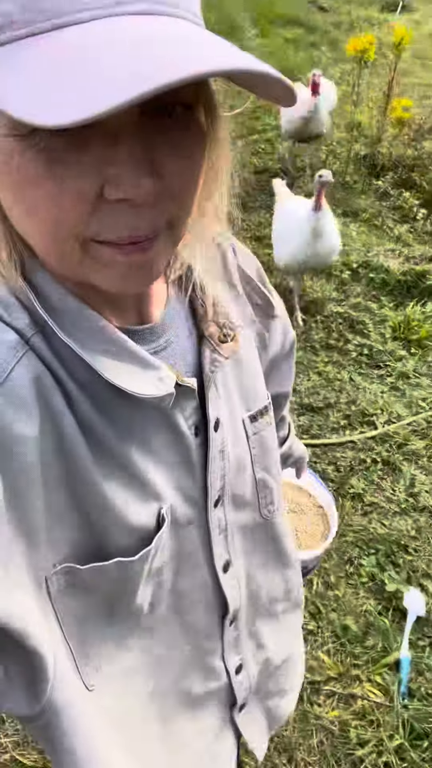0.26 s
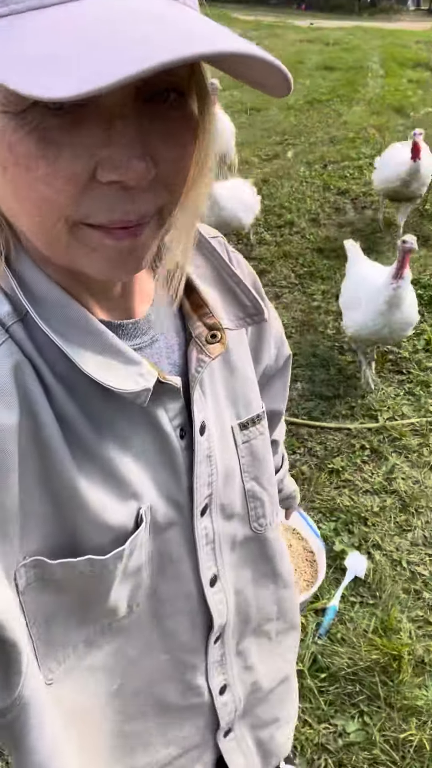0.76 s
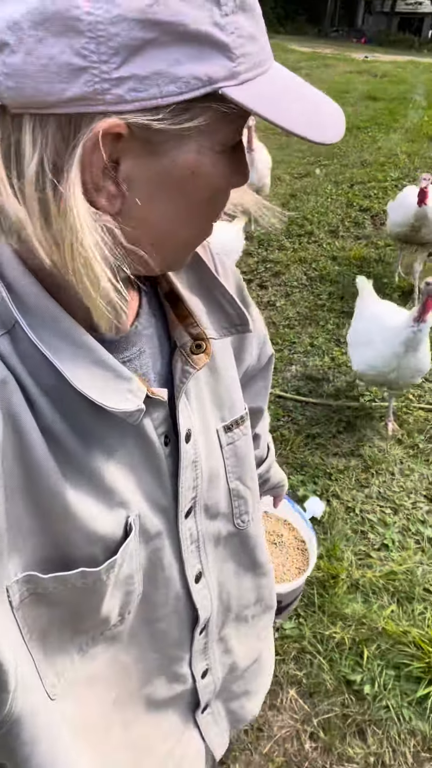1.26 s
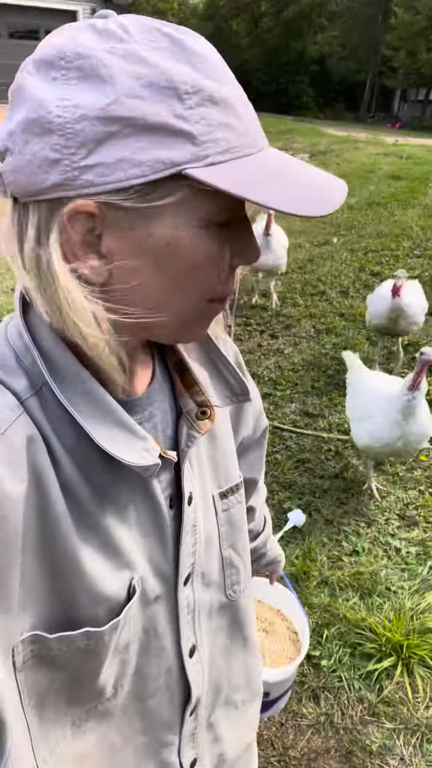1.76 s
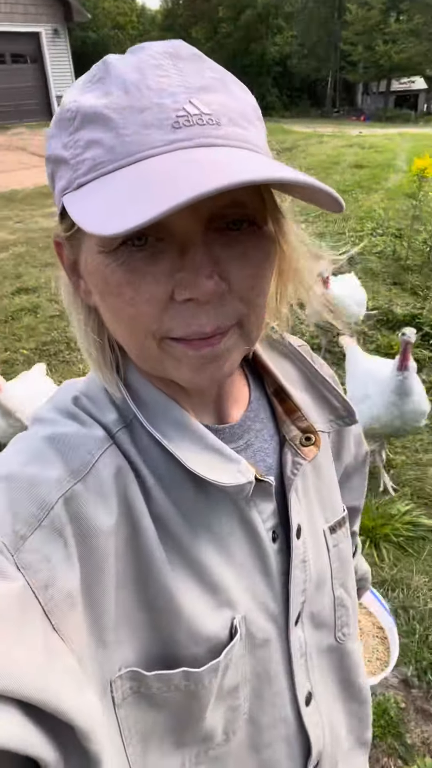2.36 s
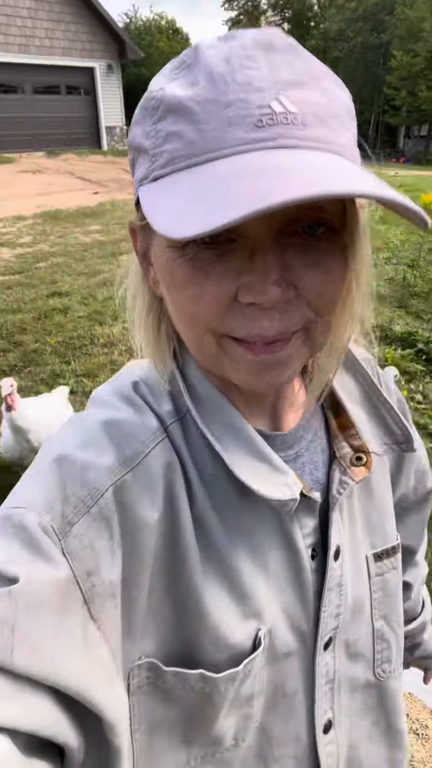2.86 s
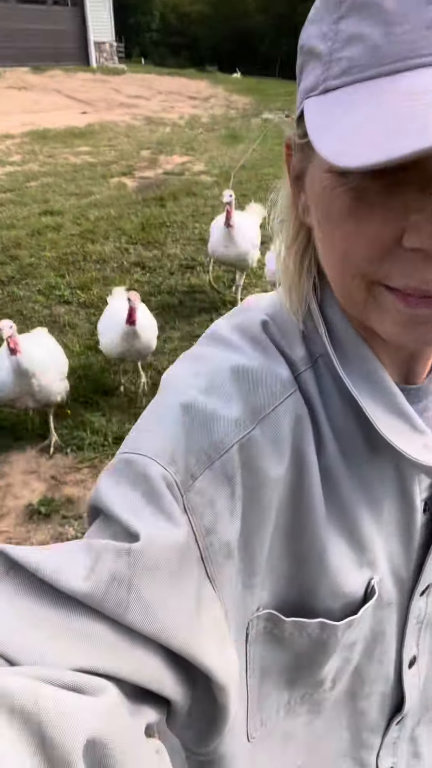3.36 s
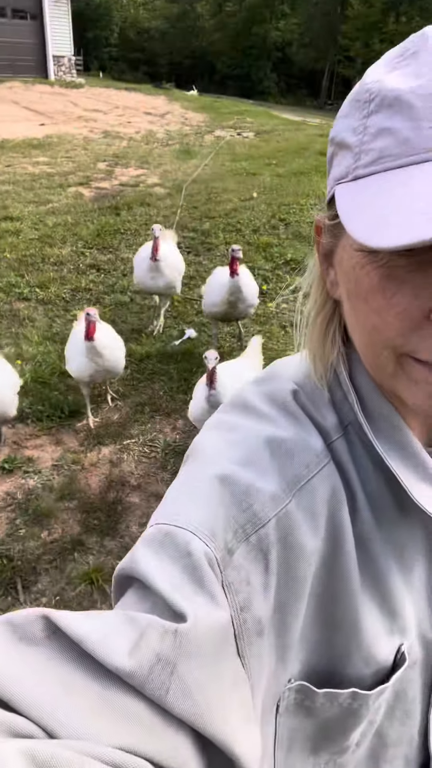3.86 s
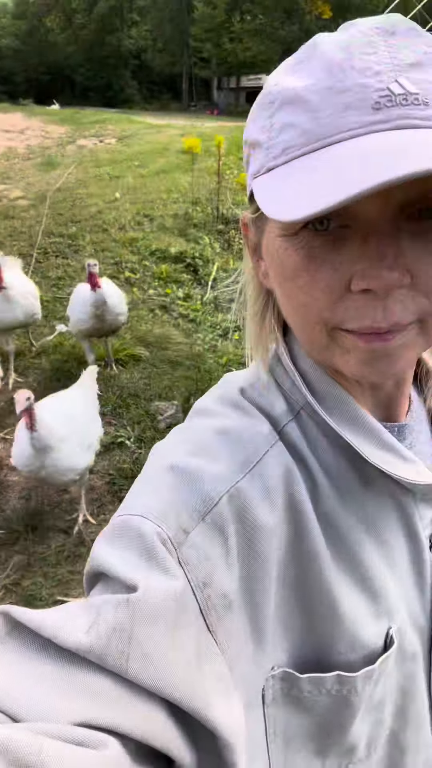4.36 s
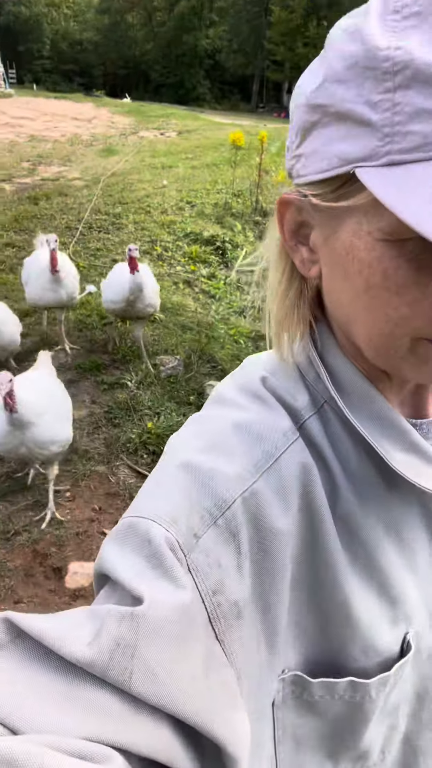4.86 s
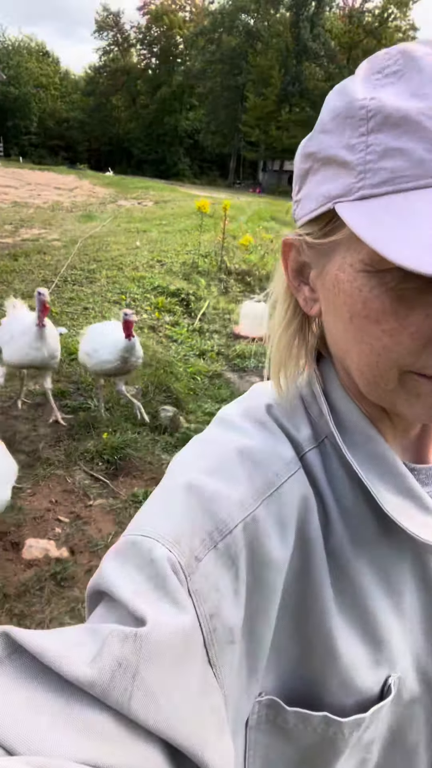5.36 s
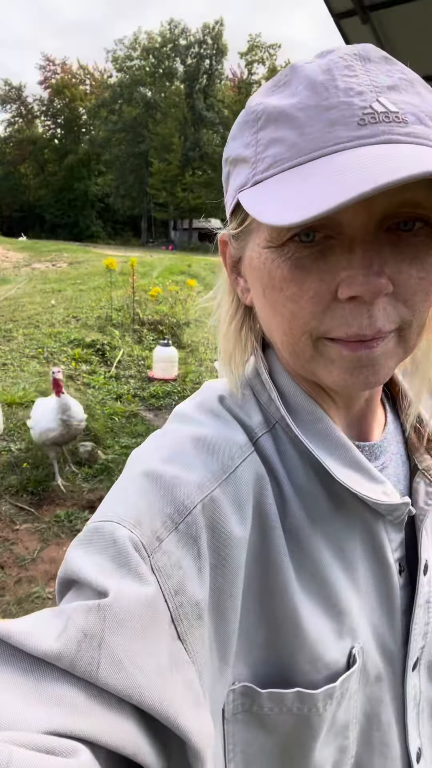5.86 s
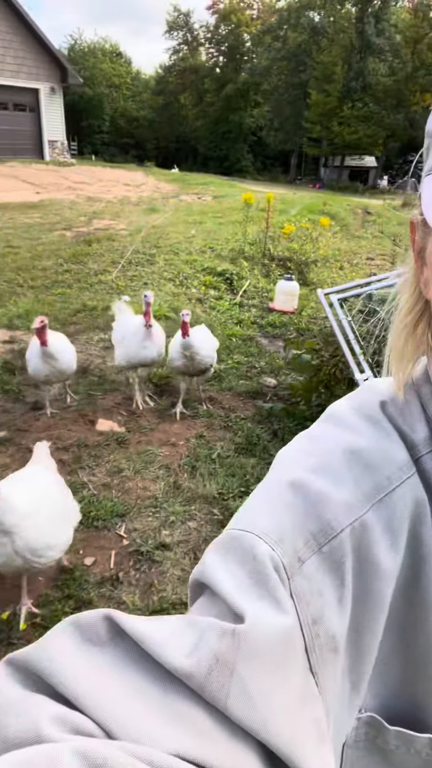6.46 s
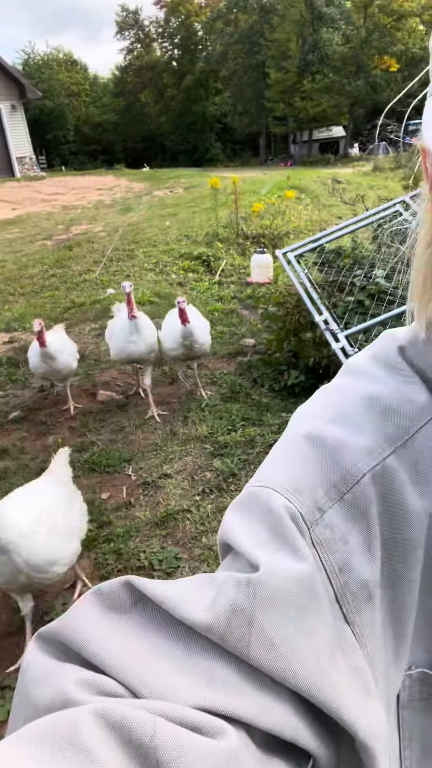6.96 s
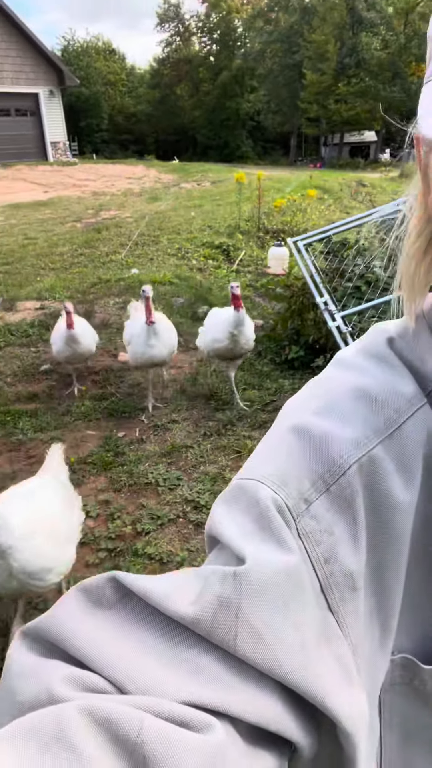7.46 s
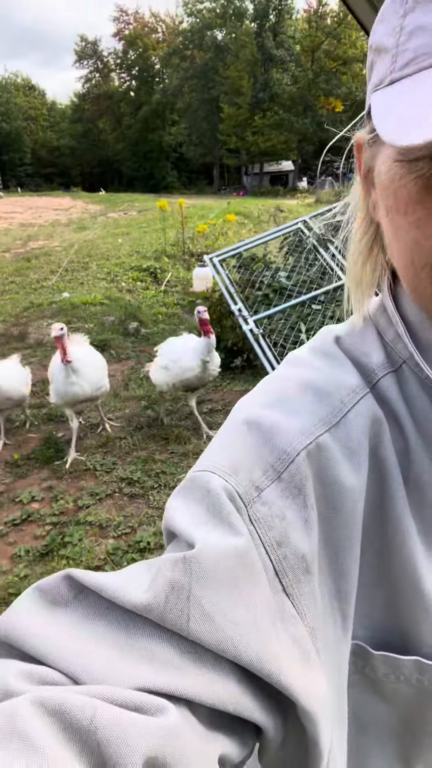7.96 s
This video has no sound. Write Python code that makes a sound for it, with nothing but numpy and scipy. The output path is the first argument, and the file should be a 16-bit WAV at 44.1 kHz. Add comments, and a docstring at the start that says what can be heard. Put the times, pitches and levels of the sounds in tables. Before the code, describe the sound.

A close handheld stereo microphone in an open grassy yard. At 0-0.4 s, wind rumbles and dull knocks hit the housing as a turkey begins a whistled call, a wavering held note followed by quick rising chirps until 0.8 s. Grass swishes loudly around 0.6 and 1.1 s. More trills come at 1.1-1.4 s, then a throbbing note at 1.7 s breaking into a fast jumble by 2.0 s, and another run at 2.6-2.9 s. Feet crunch at 2.8 and 3.3 s with small twig cracks. A softer low call sounds near 3.9 s. A brisk trill at 4.5-4.8 s ends with a sharp twig snap; a faint far bird whistles at 4.9 s and a brief step crunches at 5.1 s. Calls return at 5.8-6.1 and, brighter, 6.5-6.8 s. Strong rustling follows at 7.1 s, then a final lively trill from 7.8 s to the end. Faint leaf hiss continues throughout.

```python
"""A few turkeys follow a walker over a grassy yard, each calling a short trill of whistled notes:
near-sines of gliding pitch, with an octave weighted by the throat and a short diffuse echo.
Feet swish and crunch through grass (dense coloured grains) and twigs snap (noise bursts with rings).
Gusts buffet the microphone ports (low noise bands), knocks shake the housing (damped sines),
and one far bird whistles (a sine) over leaves in the breeze (steady coloured noise)."""
import sys
import numpy as np
from scipy import signal
from scipy.fft import rfft, irfft
from scipy.io import wavfile

SR = 44100
rng = np.random.default_rng(int(sys.argv[2]) if len(sys.argv) > 2 else 0)


def file_out(sig):
    """Save sig as 16-bit WAV at sys.argv[1]."""
    # one column per channel
    cols = np.atleast_2d(sig).T
    # limit, then scale
    lim = np.clip(cols, -1, 1)
    pcm = np.round(lim * 32767).astype(np.int16)
    wavfile.write(sys.argv[1], SR, pcm)


N = 362502
TIME = np.arange(N) / SR


def from_db(db):
    """Level and amplitude: 20 dB is a factor of ten in gain."""
    return 10 ** (np.asarray(db) / 20)


def rms_one(x):
    """Normalisation: scales a signal to unit root mean square."""
    return x / np.sqrt(np.mean(x ** 2) + 1e-20)


def in_time(rows, t):
    """Linear interpolation: joins each column of a time table by straight lines."""
    s, *columns = np.transpose(rows)
    return [np.interp(t, s, column) for column in columns]


def drift(rate_hz):
    """Low-passed chance: white noise through two equal poles at rate_hz, with a spread of about 1."""
    step = 40   # samples between the values drawn
    pole = np.exp(-2 * np.pi * rate_hz * step / SR)
    noise = rng.standard_normal(N // step + 2002)
    slow = signal.lfilter([1], [1, -2 * pole, pole * pole], noise)[2000:]   # without the settling
    return np.interp(np.arange(N) / step, np.arange(len(slow)), rms_one(slow))


def band(x, low_hz, high_hz):
    """Band-pass filtering: passes what lies between two corner frequencies."""
    return signal.sosfilt(signal.butter(2, [low_hz, high_hz], "band", fs=SR, output="sos"), x)


def grains(per_s, spread_db):
    """Shot noise: random clicks of uneven size and either sign, unrelated in mid and side."""
    sizes = from_db(spread_db * np.minimum(rng.exponential(1, (2, N)), 5))
    sizes *= rng.choice([-1, 1], (2, N))
    return rms_one(sizes * (rng.random((2, N)) < per_s / SR))


def coloured(source, spectrum, lag_share=.55):
    """Spectral shaping and stereo coherence: part of the side is the mid turned by a quarter cycle."""
    # stereo width against frequency: f/Hz, side over mid level/dB
    width = [(2400, -2.5), (4000, -8.5), (6500, -17.5), (8200, -5.5), (11500, 1.5), (13300, 24.5)]
    log_f = np.log(np.arange(1, N // 2 + 2) * SR / N)
    level_db, side_db = [np.interp(log_f, np.log(np.array(p)[:, 0]), np.array(p)[:, 1])
                         for p in (spectrum, width)]
    mid, own = rfft(source)
    side = -1j * lag_share * mid + np.sqrt(1 - lag_share ** 2) * own   # the lag between the ports
    shaped = irfft([mid, side] * from_db([level_db, level_db + side_db]), N)
    mid, side = shaped / np.sqrt(np.mean(shaped[0] ** 2))   # the mid has rms 1
    return np.array([mid + side, mid - side])


def swells(rows, under_db):
    """Incoherent summation: bumps around their peaks and the level beneath them add as power."""
    rise_over_fall, roundness = 1.2, 1.75   # a bump rises a little slower than it fades
    power = from_db(2 * np.asarray(under_db)) * np.ones(N)
    for s, fall_ms, *peak_db in rows:
        near = slice(max(round((s - .6) * SR), 0), round((s + .6) * SR))
        t = (TIME[near] - s) * 1000 / fall_ms
        fall_db = -10 * np.where(t < 0, -t / rise_over_fall, t) ** roundness
        power[..., near] += from_db(2 * (np.array(peak_db)[:, None] + fall_db)).squeeze()
    return np.sqrt(power)


def air():
    """Stationary broadband noise: far leaves in the breeze, drifting slowly in level."""
    # spectrum of the leaves: f/Hz, relative level/dB
    leaves = [(290, -0.5), (500, 10), (1400, 1), (9880, 0), (12000, -16), (14000, -24)]
    level_db = -66.5 + 3 * drift(6)
    return from_db(level_db) * coloured(rng.standard_normal((2, N)), leaves)


def songbird():
    """Pure tone with random phase and level modulation: one thin far whistle."""
    # the whistle: t/s, length/ms, f/Hz, level/dB
    s, ms, hz, level_db = (4.905, 125, 3170, -63)
    shape = np.clip(1 - (2 * (TIME - s) * 1000 / ms - 1) ** 2, 0, 1)   # a parabolic arch
    whistle = np.sin(2 * np.pi * hz * TIME + 2 * drift(30))
    return from_db(level_db + 3 * drift(40)) * shape * whistle


def knocks():
    """Damped resonance: each dull knock is a few cycles of the housing, swelling fast and dying."""
    # knocks and jolts: t/s, level/dB, ring f/Hz
    jolts = [(0.029, -33.5, 378), (0.088, -34, 313), (0.302, -35, 190), (1.448, -47, 90), (2.803, -39, 371),
             (3.092, -48, 96), (3.118, -45.5, 97), (3.228, -47, 67), (5.157, -45, 127), (6.426, -46.5, 200),
             (6.466, -47, 187), (6.773, -46, 192), (6.984, -41.5, 98)]
    swell_cycles = 0.76   # cycles until the envelope peaks
    out = np.zeros(N)
    for s, level_db, hz in jolts:
        turns = hz * TIME[:SR // 10]
        envelope = turns / swell_cycles * np.exp(1 - turns / swell_cycles)
        out[round(s * SR):][:len(turns)] += from_db(level_db) * envelope * np.sin(2 * np.pi * turns)
    return out


def wind():
    """Turbulent pressure at the ports: rumble and sharper lumps; strong gusts go deeper and wider."""
    # gusts and jolts at the ports: peak t/s, fall by 10 dB/ms, rumble level/dB, lumps level/dB
    gusts = [(0.06, 76, -37.5, -40), (0.3, 58, -47.5, -50.5), (1.17, 40, -52, -59.5),
             (1.53, 41, -47, -44.5), (1.65, 96, -56, -42), (2.26, 42, -43.5, -66), (3.31, 27, -49.5, -48.5),
             (5.3, 93, -57, -84), (7.03, 73, -82, -56)]
    # wind under the gusts: t/s, rumble level/dB, lumps level/dB
    breeze = [(0.0, -46.5, -56), (0.6, -61.5, -89), (1.8, -55.5, -106), (2.5, -64, -71), (3.4, -62, -64.5),
              (3.85, -71, -73.5), (4.3, -70.5, -65), (5.45, -66, -68.5), (6.3, -65.5, -69.5),
              (7.3, -62.5, -62), (8.22, -70, -81)]
    rumble_gain, lumps_gain = swells(gusts, in_time(breeze, TIME))
    strong = from_db(np.interp(20 * np.log10(rumble_gain), [-64, -38], [-20, -3]))
    noise = rng.standard_normal((2, N))
    rumble = rms_one(band(band(noise, 50.7, 112), 43.0, 238))
    deep = rms_one(band(band(noise[::-1], 38, 66.0), 46, 83))
    lumps = rms_one(band(band(grains(230, 2.8), 70, 340), 70, 700)) * from_db(1.5 * drift(15))
    mid, own = rumble_gain * (rumble + 3.2 * strong * deep) + lumps_gain * lumps
    side = strong * band(own - 0.82 * mid, 79, 176)
    return np.array([mid + side, mid - side])


def snaps(burst_ms=0.55, ring_ms=1.54, ring_db=-3):
    """Impulsive fracture: a noise burst peaking within a millisecond, unlike in the ports, and a ring."""
    # twigs and grit: t/s, level/dB, ring f/Hz
    twigs = [(2.692, -37, 2600), (3.288, -37.5, 1860), (4.5136, -34.5, 2870), (4.7813, -21, 4090),
             (5, -39, 4600), (6.9307, -40.5, 1900), (7.315, -44, 3700), (7.336, -42, 7200)]
    out, t = np.zeros((2, N)), TIME[:SR // 40] * 1000   # t in ms
    for (s, level_db, hz), noise in zip(twigs, rng.standard_normal((len(twigs), 2, len(t)))):
        port_noise = (noise[0] + 0.55 * noise[1] * [[1], [-1]]) / 2
        burst = t / burst_ms * np.exp(1 - t / burst_ms) * port_noise
        ring = from_db(ring_db) * np.exp(-t / ring_ms) * np.sin(2 * np.pi * hz * t / 1000)
        out[:, round(s * SR):][:, :len(t)] += from_db(level_db) * (burst + ring)
    return band(out, 670, 6800)


def steps(patchy_db=3.0):
    """Granular friction: dense clumped grains of bending blades swell with the swing of each leg."""
    # spectrum of the rustle: f/Hz, relative level per Hz/dB
    grass = [(600, -4.5), (1380, -8), (1790, -8), (2300, -0.5), (2660, -5.5), (4160, -3), (11600, -5.5),
             (14000, -31.5)]
    # legs sweeping through grass: peak t/s, fall by 10 dB/ms, level/dB
    strides = [(0.4, 27, -55.5), (0.58, 115, -48), (1.12, 85, -48.5), (1.32, 50, -54), (1.51, 10, -53.5),
               (1.905, 34, -58), (2.21, 60, -54), (2.79, 32, -48), (3.31, 40, -48), (3.45, 22, -58),
               (4.16, 70, -55.5), (4.52, 121, -59), (5.06, 12.5, -42), (5.56, 42, -56), (6.34, 97, -65.5),
               (6.51, 147, -54), (6.99, 26, -50.5), (7.075, 65, -45), (7.5, 11, -53.5), (7.7, 118, -57.5)]
    # rustle between the strides: t/s, level/dB
    shuffle = [(0.0, -59), (1.45, -63), (1.7, -60), (2.35, -65.5), (3.0, -64), (3.85, -71.5), (4.0, -65.5),
               (4.33, -86), (4.65, -59), (4.95, -59), (5.15, -64), (6.9, -64.5), (7.45, -62), (8.22, -57.5)]
    # treble of the rustle: t/s, relative level/dB
    treble = [(1.12, -1.5), (2.8, -6.5), (3.3, -8), (3.6, 0.5), (7.3, -1)]
    clumped_per_s = 9000 * from_db(3 * drift(25))
    blades = rfft(coloured(grains(clumped_per_s, 3.7), grass))
    octave = np.log2(np.arange(1, N // 2 + 2) * SR / N / 350)   # octaves above 350 Hz
    treble_db = in_time(treble, TIME)[0]
    rustle = 0
    for k in range(9):   # overlapping bands 0.65 octave apart, each coming and going by itself
        share = np.interp(octave / .65, np.arange(9), np.arange(9) == k)
        band_db = patchy_db * drift(8.1) + treble_db * (k > 5)
        rustle = rustle + irfft(blades * share, N) * from_db(band_db)
    return swells(strides, in_time(shuffle, TIME)[0]) * from_db(1.18 * drift(12.3)) * rustle


def held_notes():
    """Pitch scoop and amplitude beating: held openers rise to pitch, overshoot and swing; in some a second
    close voice beats against them as a fast throb."""
    # openers: t/s, length/ms, f after the scoop/Hz, f at the end/Hz, level/dB, throb depth/0-1
    openers = [(0.099, 51.5, 897, 966, -40, .1), (0.435, 95, 878, 850, -50, .1),
               (1.076, 113.5, 838, 960, -38.5, 0.18), (1.717, 128, 905, 949, -34.5, 0.7),
               (2.589, 82.7, 993, 1024, -35, 0.73), (4.478, 102, 880, 1070, -37.5, 0.16),
               (6.463, 66, 777, 1000, -41.5, .1)]
    scoop_ms, scoop_semitones, scoop_db = 27, -8, -10.5   # length, starting depth, starting level
    wobble_semitones, wobble_ms, wobble_decay_ms = 0.78, 53, 46   # size, period, decay time
    hold_fade_db, release_ms, release_db, throb_per_s = -1.5, 34, -9.5, 69.5
    for s, ms, hz, end_hz, level_db, throb in openers:
        t = np.arange(round(ms * SR / 1000)) * 1000 / SR   # ms
        after = np.maximum(t - scoop_ms, 0)
        swing = np.cos(2 * np.pi * after / wobble_ms) * np.exp(-after / wobble_decay_ms)
        scoop = scoop_semitones * np.maximum(1 - t / scoop_ms, 0) ** 1.374
        bend = scoop + wobble_semitones * swing
        pitch_hz = np.interp(t, [scoop_ms, ms], [hz, end_hz]) * 2 ** (bend / 12)
        shape_db = np.interp(t, [0, scoop_ms, ms - release_ms, ms],
                             [scoop_db, 0, hold_fade_db, release_db])
        # the throb deepens through the note
        beat = 1 - np.clip(throb, 0, 1) * t / ms * np.cos(np.pi * throb_per_s * t / 1000) ** 2
        yield s, pitch_hz, from_db(level_db + shape_db) * beat * signal.windows.tukey(len(t), .1)


def bent_note(ms, hz, start, end, level_db, place):
    """Frequency glide with a register break: late in a rising note the voice falters and jumps up."""
    # share of the break by glide, the widest running through unbroken: glide/semitones, share/0-1
    break_share = [(1, 0), (3, 1), (7.5, 1), (9, 0)]
    break_at, break_ms, break_semitones, break_dip = .66, 2.5, 2.1, .45   # place and dip are shares
    u = np.linspace(0, 1, round(ms * SR / 1000))   # progress through the note
    warp = np.log(.5) / np.log(np.clip(place, .1, .9))   # puts the peak of the sine at its place
    height = from_db(level_db) * np.abs(np.sin(np.pi * u ** warp)) ** 0.92
    bend = (2 * u - 1) * (start * (u - 1) + end * u)   # a parabola through start, zero and end
    x = (u - break_at) * ms / break_ms
    jump = np.interp(end - start, *np.transpose(break_share))
    bend += break_semitones * jump * (np.tanh(x) / 2 + .5 - u)
    return hz * 2 ** (bend / 12), height * (1 - break_dip * jump * np.exp(-x ** 2))


def notes():
    """Frequency and amplitude contours: yields every note as its start, pitch and height."""
    # one-way glides, mostly upward, before the break:
    # t/s, length/ms, middle f/Hz, glide/semitones, level/dB, place of the peak/0-1
    glides = [(0.154, 69, 959, 1.5, -41, 0.45), (0.242, 39, 601, -8.5, -46, 0.47),
              (0.554, 50, 880, 10.5, -42, 0.52), (0.626, 43.5, 871, 11.5, -39, 0.62),
              (0.694, 35, 846, 9, -42, 0.39), (1.197, 42, 943, 2, -37.5, 0.53),
              (1.26, 37, 940, 1.5, -35.5, 0.6), (1.314, 34, 887, 4.5, -34.5, 0.63),
              (1.845, 50, 914, 8, -38.5, 0.56), (1.868, 30, 686, 0.8, -37.5, 0.55),
              (1.895, 19, 625, -7, -37.5, 0.39), (1.91, 24, 957, 3, -30, 0.52),
              (1.958, 23, 926, 2, -31, 0.62), (1.975, 36, 1056, -9, -35.5, 0.81),
              (2.016, 13, 518, 1.5, -37, 0.5), (2.711, 36, 830, 10.5, -43.5, 0.44),
              (2.775, 37, 876, 9.5, -42.5, 0.58), (2.835, 36.6, 880, 9.5, -40, 0.59),
              (3.877, 74, 930, 2, -49, 0.4), (3.963, 54, 583, 0.5, -40, 0.62),
              (4.607, 31, 973, 4, -35.5, 0.42), (4.655, 35.4, 960, 3, -36, 0.47),
              (4.707, 34, 940, 3.5, -35.5, 0.5), (4.759, 44, 1004, 7, -37.5, 0.38),
              (4.785, 44.8, 892, -13, -34, 0.8), (5.81, 105, 997, -1.5, -52.5, 0.2),
              (5.914, 25, 750, 5, -42, 0.73), (5.984, 33.6, 804, 4, -40.5, 0.46),
              (6.005, 16.3, 1093, 2, -41.5, 0.65), (6.523, 66, 1034, 1, -35.5, 0.58),
              (6.597, 43, 975, 2.5, -32.5, 0.78), (6.656, 34, 972, 3.5, -32.5, 0.79),
              (6.712, 33.5, 1020, 3, -32.5, 0.67), (7.841, 16, 616, 0, -37, 0.63),
              (7.853, 28.7, 852, 1.5, -37, 0.57), (7.884, 67, 932, 1, -37.5, 0.47),
              (7.908, 28, 554, -5, -49.5, 0.4), (7.96, 42, 840, 2, -36.5, 0.77),
              (8.032, 31.8, 1048, 5.5, -33.5, 0.37), (8.073, 43, 1027, 5, -37.5, 0.68),
              (8.127, 40.6, 1058, 2.5, -30.5, 0.74)]
    # closing notes that arch up and drop away:
    # t/s, length/ms, middle f/Hz, level/dB, place of the peak/0-1
    closers = [(0.758, 42.6, 730, -36, 0.64), (1.373, 41, 787, -37, 0.5), (2.894, 47, 717, -42, 0.17),
               (6.047, 57, 812, -40, 0.59), (6.757, 56.5, 841, -36, 0.7), (8.186, 38, 1000, -34.5, 0)]
    early_share = 0.387   # share of a glide done by the middle of the note
    arch_start, arch_end = -2.68, -5.5   # semitones against the middle
    yield from held_notes()
    for s, ms, hz, glide, level_db, place in glides:
        start, end = -early_share * glide, (1 - early_share) * glide
        yield s, *bent_note(ms, hz, start, end, level_db, place)
    for s, ms, hz, level_db, place in closers:
        yield s, *bent_note(ms, hz, arch_start, arch_end, level_db, place)


def syrinx(pitch_hz, height, overtone_db, honk_db=-11, low_db=-9):
    """Source and filter: the throat weights a near sine's octave; held low notes add a third partial."""
    # octave against the whistle: octave f/Hz, relative level/dB
    throat = [(1500, -28), (2100, -12.5), (2500, -3.5)]
    phase = 2 * np.pi * np.cumsum(pitch_hz) / SR
    octave = from_db(np.interp(2 * pitch_hz, *np.transpose(throat)) + overtone_db[:len(phase)])
    octave += from_db(low_db) * (np.median(pitch_hz) < 650)   # low notes are reedier
    third = from_db(honk_db) * (np.max(pitch_hz) < 680 and len(phase) > SR / 25)
    return height * (np.sin(phase) + octave * np.sin(2 * phase) + third * np.sin(3 * phase))


def turkeys(flutter_db=2.3, echo_db=-12.5, echo_ms=25):
    """Level-difference panning and diffuse reflection: calls set left to right, with a short echo."""
    # place and timbre of the caller: t/s, left over right level/dB, octave relative level/dB
    caller = [(.2, 2, -10.5), (1.0, -2, 6), (2.0, 3.5, -8), (2.7, -2.5, -3.5), (4.5, 7.5, -4.5),
              (5.85, 2, 8.5), (5.92, 10, 6), (6.5, 5.5, -1.5), (8.2, 8, -2)]
    pan_db, octave_db = in_time(caller, TIME)
    calls = np.zeros(N + SR)
    flicker_db = np.pad(octave_db + 3.5 * drift(30), (0, SR))
    waver = 2 ** (np.pad(.3 * drift(25), (0, SR)) / 12)   # spread of 0.3 semitones
    for s, pitch_hz, height in notes():
        start = round(s * SR)
        wavering_hz = pitch_hz * waver[start:][:len(pitch_hz)]
        calls[start:][:len(pitch_hz)] += syrinx(wavering_hz, height, flicker_db[start:])
    calls = calls[:N] * from_db(flutter_db * drift(60))   # the membranes flutter a little
    decay = np.exp(-TIME[:SR // 5] * 1000 / echo_ms)
    # walls are some metres off: the echo builds late
    tail = rng.standard_normal((2, SR // 5)) * decay * (1 - decay)
    tail /= np.sqrt(np.sum(tail ** 2, axis=1, keepdims=True))
    echo = signal.fftconvolve(calls[None], tail, axes=1)[:, :N]
    left = from_db(pan_db)
    direct = calls * 2 * np.array([left, np.ones(N)]) / (1 + left)
    return direct + from_db(echo_db) * echo


def scene():
    """Superposition: pressures of leaves, far bird, knocks, wind, twigs, feet and turkeys add."""
    return air() + songbird() + knocks() + wind() + snaps() + steps() + turkeys()


def record(dry):
    """Linear filtering: the microphone housing has a dip in the lower treble; the top is cut."""
    dipped = dry - .5 * signal.lfilter(*signal.iirpeak(4350, 7, fs=SR), dry)
    # 70 dB down from 15735 Hz upward
    return signal.sosfilt(signal.cheby2(12, 70, 15735, fs=SR, output="sos"), dipped)


dry = scene()
out = record(dry)
file_out(out)
```